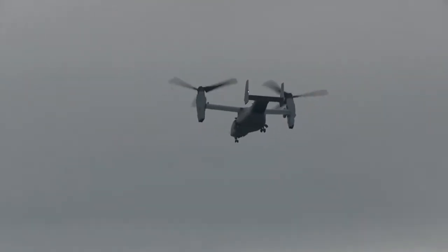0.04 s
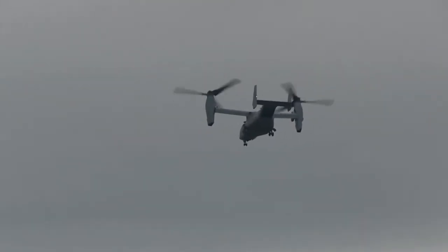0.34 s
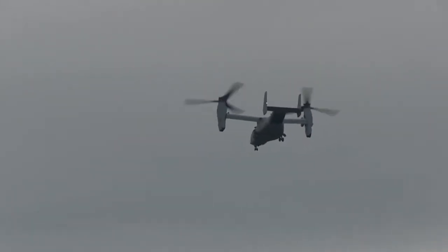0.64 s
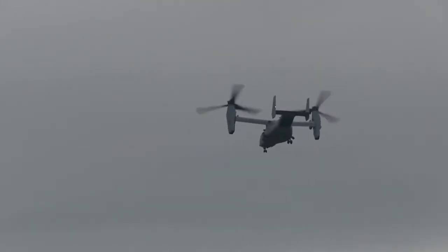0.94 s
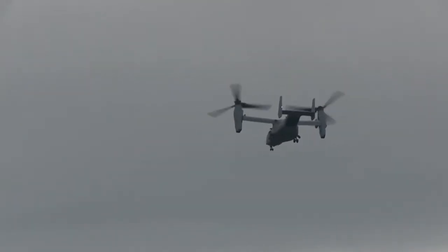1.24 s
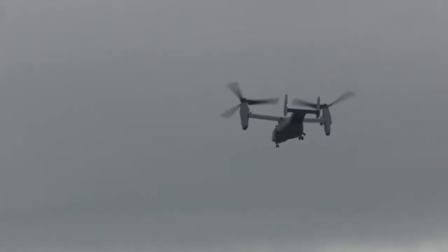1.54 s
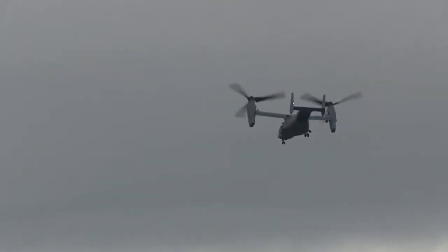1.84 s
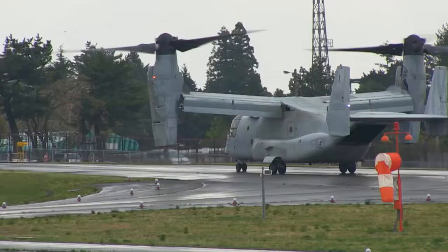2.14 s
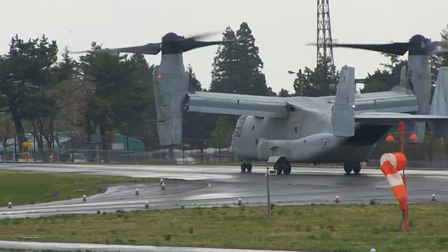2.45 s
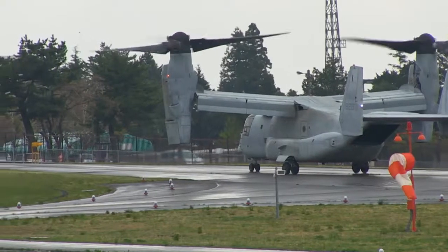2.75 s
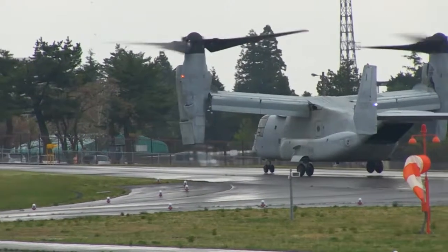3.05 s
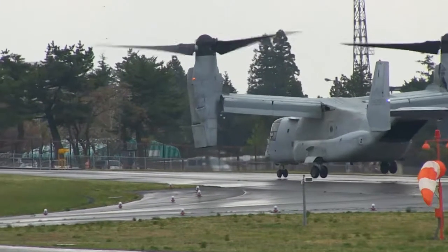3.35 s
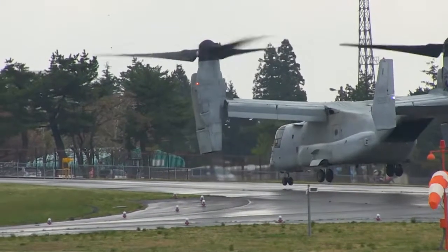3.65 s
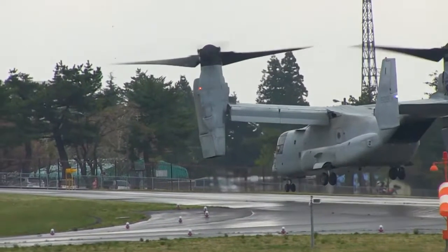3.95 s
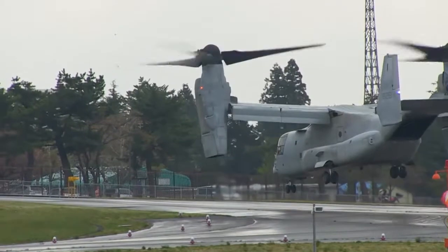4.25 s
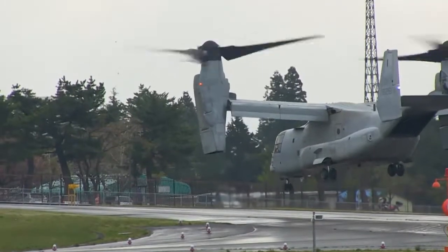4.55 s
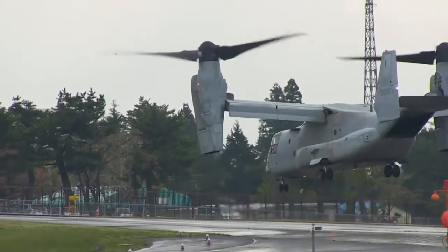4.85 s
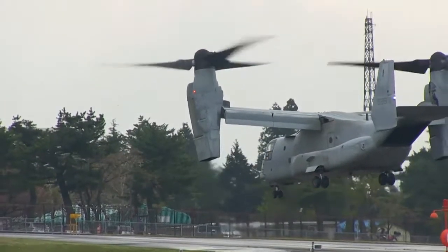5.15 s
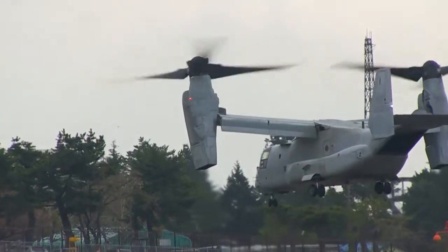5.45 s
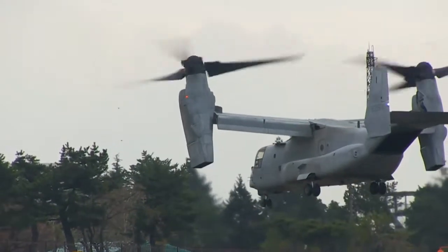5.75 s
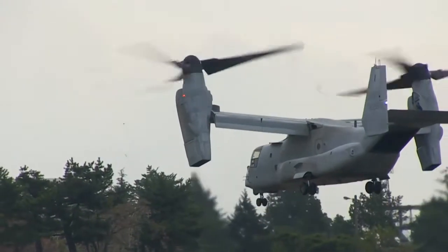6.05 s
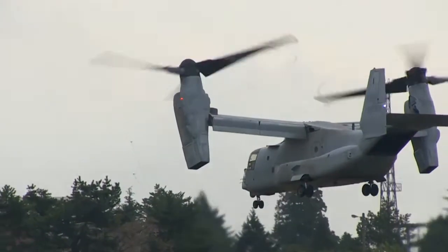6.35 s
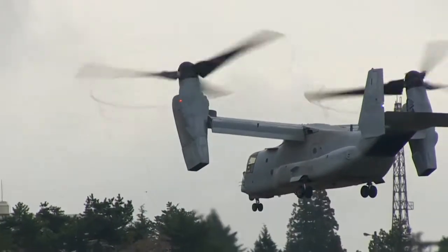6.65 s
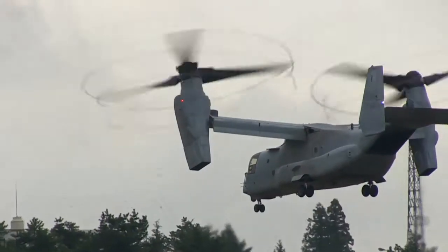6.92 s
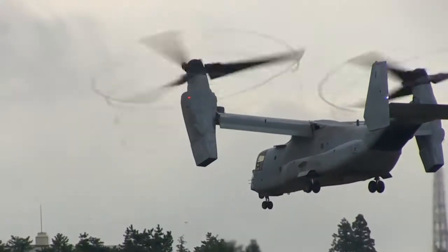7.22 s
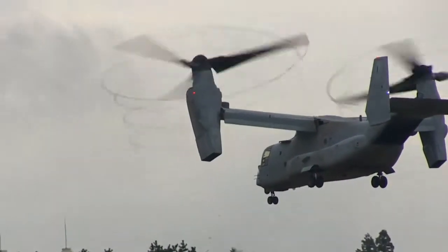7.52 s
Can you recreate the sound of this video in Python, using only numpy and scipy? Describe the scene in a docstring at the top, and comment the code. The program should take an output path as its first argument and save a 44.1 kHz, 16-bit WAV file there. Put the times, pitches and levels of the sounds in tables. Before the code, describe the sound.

A tiltrotor aircraft beats softly in the distance, then suddenly sounds close, lifting off with loud chopping slaps and engine roar before climbing away.

```python
"""A tiltrotor aircraft hovers far off; the scene then cuts to it lifting off close by and climbing away.
Each blade pass pushes out a low thump, slaps through the tip vortices of the blades ahead and swishes by;
the hardest strikes crack. Downwash and turbines roar between the beats, with a low rotor drone and a
breathy blade whistle. The two microphone channels are in opposite polarity and overload on big slaps."""
import sys
import numpy as np
from scipy import signal
from scipy.fft import rfft, irfft, next_fast_len
from scipy.io import wavfile
from scipy.ndimage import uniform_filter1d, map_coordinates

SR = 44100
rng = np.random.default_rng(int(sys.argv[2]) if len(sys.argv) > 2 else 0)


def transcribe(signal):
    """Save signal, clipped to [-1, 1], as a 16-bit WAV file at the path in sys.argv[1]."""
    frames = np.atleast_2d(signal).T
    limited = np.clip(frames, -1, 1)
    pcm = np.round(limited * 32767).astype(np.int16)
    wavfile.write(sys.argv[1], SR, pcm)


N = 338688
CUT_S = 2.16  # from the distant hover to the lift-off

# The rotor clock. Each row: time in seconds, blade passes so far.
PASSES = [(.004, 0), (1.578, 32), (2.176, 44), (2.749, 56), (3.521, 72), (4.29, 88), (5.073, 104),
          (6.239, 128), (7.026, 144), (7.72, 158)]
# The aircraft's swell with thrust and distance. Each row: time in seconds, dB relative to lift-off.
LOUDNESS = [(0, -15.5), (.6, -15.5), (1.4, -16), (2.14, -16), (2.5, -17), (2.85, -11.5), (3.3, -5.5),
            (3.781, 0.5), (4.151, -4), (4.6, -8), (5.3, -8.5), (5.751, -12.5), (6.3, -12), (7.151, -12.5),
            (7.68, -13)]
# How far the rotors have risen above the listener. Each row: time in seconds, share from 0 to 1.
RISEN = [(4.9, 0.35), (5.3, 0.8), (5.45, 0.7), (5.65, 1)]
# The hardest vortex strikes. Each row: time in seconds, slap level in dB, crack level in dB.
STRIKES = [(.5916, -51, -40), (0.6407, -48, -47), (0.6871, -46, -44), (3.1851, -27.5, -36),
           (3.2812, -21.5, -34.5), (3.2999, -32, -31.5), (3.3288, -21.5, -29), (3.3798, -16.5, -36),
           (3.4262, -19.5, -37.5), (3.4728, -36, -27.5), (3.521, -22, -27), (3.569, -21, -23),
           (3.617, -29, -24), (3.6618, -24, -35), (3.6655, -19, -20.5), (3.713, -23, -19),
           (3.733, -31.5, -30.5), (3.7612, -13.5, -26), (3.78, -35, -32), (3.8087, -14, -24),
           (3.8571, -19, -16.5), (3.9066, -26, -23), (3.9516, -13, -27.5), (3.9553, -13.5, -35),
           (4.0014, -8.5, -17.5), (4.0058, -19.5, -28.5), (4.0503, -24.5, -32), (4.072, -27, -32),
           (4.3456, -23, -30), (4.4363, -32, -36), (4.4841, -22, -35), (4.7273, -27.5, -37.5),
           (4.7772, -23, -36.5), (5.171, -28, -35), (5.3656, -27.5, -41.5)]


def amp(db):
    return 10 ** (np.asarray(db) / 20)


def unit(x):
    """Scale so that the first channel has rms 1."""
    return x / np.sqrt(np.mean(np.atleast_2d(x)[0] ** 2) + 1e-20)


def along(points, hz):
    """Read (Hz, value) points on a log frequency axis."""
    freqs, values = np.transpose(points)
    return np.interp(np.log(hz + 1), np.log(freqs + 1), values)


def curve(points):
    """(seconds, value) points as one value per sample."""
    return np.interp(np.arange(N) / SR, *np.transpose(points))


def bumps(times, half_length):
    """A bell-shaped swell, 0-1, around each time: samples x swells."""
    return np.exp(-((np.arange(N)[:, None] / SR - times) / half_length) ** 2)


def wobble(rate):
    """A smooth random curve, rate knots a second."""
    return map_coordinates(rng.standard_normal(int(N * rate / SR) + 4), [np.arange(N) * rate / SR])


def noise(channels=2):
    return rng.standard_normal((channels, N))


def filtered(x, response):
    """x through a frequency response."""
    size = next_fast_len(N + SR // 2)
    return irfft(rfft(x, size) * response(np.fft.rfftfreq(size, 1 / SR)), size)[..., :N]


def coloured(x, spectrum):
    """x through an EQ curve, at rms 1."""
    return unit(filtered(x, lambda hz: amp(along(spectrum, hz))))


def delayed(x, seconds):
    return filtered(x, lambda hz: np.exp(-2j * np.pi * hz * seconds))


def impulses(times, sizes):
    """Single-sample clicks at the given times."""
    at = np.round(np.ravel(times) * SR).astype(int)
    inside = (at >= 0) & (at < N)
    return np.bincount(at[inside], np.ravel(sizes)[inside], N)


def cut(far, near):
    """The distant hover gives way to the lift-off."""
    return np.where(np.arange(N) < CUT_S * SR, far, near)


def spread(pair):
    """A shared and a diffuse signal become left and right."""
    # Likeness of the two sides. Each row: frequency in Hz, coherence from 0 to 1.
    alike = [(100, 0.95), (300, 0.98), (600, 0.96), (1100, 0.81), (2200, 0.68), (4200, 0.87), (8000, 0.45)]
    angle = lambda hz: np.arccos(along(alike, hz)) / 2
    shared, diffuse = filtered(pair, lambda hz: np.array([np.cos(angle(hz)), np.sin(angle(hz))]))
    return np.array([shared + diffuse, shared - diffuse])


def beat_times():
    """The moment of every blade pass."""
    times, passes = np.transpose(PASSES)
    return np.interp(np.arange(passes[-1]), passes, times)


def at_beats(values):
    """A curve's value at every blade pass."""
    return np.interp(beat_times(), np.arange(N) / SR, values)


def since_beat(delay_s):
    """Seconds from the nearest blade pass, shifted by a delay."""
    passes = curve(PASSES)
    rate = np.mean(np.gradient(passes)) * SR
    passes = passes - delay_s * rate
    return (passes - np.round(passes)) / rate


def gentle(beats):
    """True for the blade passes that have no hard strike."""
    return np.abs(beats[:, None] - np.transpose(STRIKES)[0]).min(axis=1) > .01


def level(db, follows, overhead_db, far_db, treble=0, lag_s=0):
    """A layer's fader in dB: it follows the loudness and brightness, and shifts overhead and far off."""
    # The treble against the rest. Each row: time in seconds, gain in dB.
    brightness = [(0, 5), (.55, 5.5), (1.2, 1), (2.13, 1.5), (2.2, 4), (2.45, -1.5), (2.85, -2), (4.85, -2),
                  (5.6, -6.5), (6.5, -4), (7.1, -0.5), (7.68, 4)]
    loudness_db = curve(np.array(LOUDNESS) + [lag_s, 0])
    position_db = overhead_db * curve(RISEN) + cut(far_db, 0)
    return db + follows * loudness_db + position_db + treble * curve(brightness)


def turbines():
    """Compressor tones blurred by the air, loudest in front of the intakes and chopped by the blades."""
    # Each row: centre in Hz, width in Hz, level in dB.
    whine_bands = [(5890, 580, -82.5), (7500, 900, -92), (9080, 910, -99)]
    # How directly the intakes face the listener. Each row: time in seconds, gain in dB.
    facing = [(.7, 3.5), (2.14, 2.5), (2.18, -9.5)]
    whine = 0
    for centre, width, db in whine_bands:
        band = filtered(noise(), lambda hz: np.exp(-2 * ((hz - centre) / width) ** 2))
        whine += amp(db) * unit(band)
    chop_db = 2.3 * np.cos(2 * np.pi * curve(PASSES) + .8)
    return spread(whine * amp(curve(facing) + chop_db + 2.2 * wobble(16)))


def roar():
    """Churning downwash and hissing exhaust fill the gaps; the wash rumbles most near the ground."""
    # Colours of wash and exhaust. Each row: frequency in Hz, relative level in dB.
    downwash_eq = [(20, -10), (70, -9.5), (130, -0.5), (240, -2.5), (400, -5), (500, -9.5), (650, -4.5),
                   (950, -10.5), (1300, -14.5), (3000, -82)]
    exhaust_eq = [(600, -23), (1050, -3.5), (1500, -5.5), (2300, -7.5), (3300, -15.5), (4100, -15.5),
                  (5200, -28.5), (6000, -34.5), (7000, -39), (9500, -44.5), (11000, -85)]
    rumble_hz = 191
    wash_db = level(db=-44.0, follows=0.84, overhead_db=0.95, far_db=-1.5, lag_s=0.073)
    hiss_db = level(db=-55.5, follows=0.75, overhead_db=5.0, far_db=0.5, treble=0.6)
    rumble_db = level(db=5.5, follows=0.23, overhead_db=-1.5, far_db=-7.0)
    churn = wobble(12)
    surge_db = 1.68 * np.exp(-(since_beat(.006) / 0.019) ** 2)  # just after each blade
    flow = coloured(noise(), downwash_eq)
    rumble = filtered(flow, lambda hz: np.exp(-(hz / rumble_hz) ** 4))
    wash = amp(surge_db) * (flow - rumble) + amp(rumble_db) * rumble
    wash *= amp(wash_db + 1.7 * churn + 0.93 * wobble(70))
    hiss = amp(hiss_db + churn + 1.2 * wobble(90)) * coloured(noise(), exhaust_eq)
    return spread(wash + hiss)


def drone():
    """The lowest multiples of the blade rate, each wavering in the moving air."""
    # Rotor tones far and near. Each row: multiple of the blade rate, relative level in dB.
    far_orders = [(2, -3), (3, -2), (4, 8.5)]
    near_orders = [(1, -23), (2, -1), (3, -4), (4, 1.5)]
    # The drone's fader. Each row: time in seconds, level in dB.
    fader = [(0, -61), (.64, -67), (1.13, -63.5), (2.12, -67.5), (2.2, -59), (2.8, -63.5), (3.05, -77),
             (3.7, -59), (4.2, -56), (5, -55.5), (5.6, -58.5), (6.7, -62), (7.37, -60), (7.68, -63)]
    phase = 2 * np.pi * curve(PASSES)

    def tones(orders):
        return unit(sum(amp(db + 1.5 * wobble(2.2)) * np.cos(k * phase + np.pi / 4) for k, db in orders))
    return amp(curve(fader)) * cut(tones(far_orders), tones(near_orders))


def whistle(centre_hz, fall_hz_per_s, width_hz, delay_s, length_s):
    """Between slaps a blade edge sheds a wide, breathy tone that falls as the blade turns away."""
    # The whistle's fader. Each row: time in seconds, level in dB.
    fader = [(2.1, -86), (2.25, -71), (3.3, -59.5), (3.8, -53.5), (4.3, -57), (4.7, -61.5), (5.3, -61.5),
             (5.7, -67.5), (6.7, -74.5), (7.5, -64.5)]
    # Single whistles that stand out. Each row: time in seconds, boost in dB.
    accents = [(4.945, 9), (5.238, 8), (6.206, 6), (6.257, 9)]
    alike = 0.27  # share of the power common to both sides
    since = since_beat(delay_s)
    pitch = centre_hz * (1 + 0.07 * wobble(12)) - fall_hz_per_s * since
    breath = filtered(noise(3), lambda hz: np.exp(-(hz / width_hz) ** 2))
    breath = np.sqrt(alike) * breath[0] + np.sqrt(1 - alike) * breath[1:]
    times, boost_db = np.transpose(accents)
    swell = amp(bumps(times, .02) @ boost_db + 1.2 * wobble(20)) * np.exp(-(since / length_s) ** 2)
    tone = breath * np.sin(2 * np.pi * np.cumsum(pitch) / SR)
    return amp(curve(fader)) * unit(swell * tone)


def thumps():
    """Each blade's load pushes the air and pulls it back: a low thump."""
    # Surges of blade load at lift-off. Each row: centre and half length in seconds, boost in dB.
    surges = [(3.34, 0.16, 8), (3.695, 0.11, 7), (3.869, 0.086, 8), (3.996, 0.044, 4.5), (5.055, .2, 7)]
    # The thump's colour. Each row: frequency in Hz, relative level in dB.
    thump_eq = [(40, -37), (70, -15), (105, -2), (150, 3.5), (200, -0.5), (260, -13), (400, -78)]
    beats = beat_times()
    jitter = .0003 * rng.standard_normal(len(beats))
    pushes = impulses(beats + .0008 + jitter, amp(.9 * rng.standard_normal(len(beats))))
    times, half_length, boost_db = np.transpose(surges)
    thump_db = level(db=-36.0, follows=1.52, overhead_db=-4.0, far_db=-4.0)
    thump_db += bumps(times, half_length) @ boost_db + wobble(4.02)
    return amp(thump_db) * filtered(coloured(pushes, thump_eq), lambda hz: np.exp(.4j))


def wake():
    """In its own wake a blade slaps more squarely and briefly: gain in dB, square share, spread in s."""
    # Spells in the wake. Each row: centre and half length in seconds, slap gain in dB, added square share.
    spells = [(2.09, .06, 4, .3), (2.8, .05, 3, .23), (3.345, .06, -1.5, .3), (3.53, .13, -6, .2),
              (3.81, .12, -4, .5), (3.995, .035, 3, .6), (4.21, .06, -1.5, 0), (4.62, .09, -3, 0),
              (4.957, .2, 1, .1), (5.42, .11, 9.5, .5), (6.335, .07, 1.8, .55), (6.6, .19, 1, .9),
              (6.81, .05, 2.5, .5), (6.965, .044, 5.5, .3), (7.272, .022, 4.5, .3), (7.49, .04, 2, 0)]
    calm_share, spread_s = 0.12, .0055
    times, half_length, gain_db, added_share = np.transpose(spells)
    inside = bumps(times, half_length)
    share = np.clip(calm_share + inside @ added_share, 0, 1)
    width = spread_s * (1 - .5 * share) * amp(-.18 * curve(LOUDNESS))  # louder beats are tighter
    return inside @ gain_db, share, width


def vortex_strikes(share, width, memory, scatter_db, wander_s, reach, count):
    """Each blade cuts one vortex squarely and grazes more; the wake drifts from blade to blade."""
    beats = beat_times()
    share, width = at_beats(share)[:, None], at_beats(width)[:, None]
    size = amp(scatter_db * rng.standard_normal((len(beats), 1)))
    places = np.linspace(-1, 1, count)

    def drift():
        steps = rng.standard_normal((len(beats), count))
        return signal.lfilter([np.sqrt(1 - memory ** 2)], [1, -memory], steps, axis=0)

    def grazes(power):
        offsets = width * (reach * places + .12 * drift())
        weights = drift() * np.exp(-1.3 * places ** 2)
        weights /= np.linalg.norm(weights, axis=1, keepdims=True)
        return impulses(beats[:, None] + offsets, size * np.sqrt(power) * weights)
    square = impulses(beats + wander_s * drift()[:, 0], size * np.sqrt(share) * gentle(beats)[:, None])
    return np.array([square + grazes(1 - share), grazes(1)])


def swish(strikes, puffs, width):
    """A blade's turbulent edge hisses as its tip moves towards the listener; far off it is softer."""
    # Swish colours far and near. Each row: frequency in Hz, relative level in dB.
    far_eq = [(500, -52), (1000, -4), (1500, 1.5), (1900, -5.5), (2500, -2.5), (3300, -14.5), (4200, -9.5),
              (5300, -26.5), (6000, -58), (7000, -35.5), (10000, -41), (12000, -82)]
    near_eq = [(500, -4), (1000, 7), (1200, -7.5), (1500, 4.5), (2100, -2), (3200, -9), (4300, -13),
               (5200, -28.5), (6000, -30), (7000, -39.5), (9500, -50), (11500, -72.5)]
    risen = curve(RISEN)
    gate = np.exp(-np.abs(since_beat(0.00088 + .0008 * risen) / (1.23 * width)) ** 1.9) / np.sqrt(width)
    near = unit(gate * amp(3.0 * wobble(350)) * noise()) + 0.25 * (1 - risen) * unit(strikes)
    far_gate = np.exp(-(since_beat(-0.0016 + 0.00092 * wobble(23)) / 0.012) ** 2)
    far = unit(far_gate * amp(2.3 * wobble(200) + 1.2 * wobble(20)) * noise()) + 0.36 * unit(puffs)
    swish_db = level(db=-46.5, follows=0.93, overhead_db=-4.0, far_db=-0.8, treble=0.84)
    return amp(swish_db) * cut(coloured(far, far_eq), coloured(near, near_eq))


def slap(strikes, puffs, wake_db):
    """Vortex strikes slap; under the rotors the slap turns rounder and the ground answers it."""
    # Slap colours far, near and climbing. Each row: frequency in Hz, relative level in dB.
    far_eq = [(140, -28.5), (210, 9), (290, 4.5), (390, 8), (500, -5.5), (680, 4), (900, -5.5), (1150, -29),
              (2000, -37), (5000, -72)]
    near_eq = [(140, -34), (205, -1.5), (280, -1.5), (350, 2), (430, 1), (520, -13.5), (640, -2),
               (800, -3.5), (1000, -25.5), (2000, -40), (5000, -82)]
    climb_eq = [(140, -36.5), (195, 6), (245, 7), (300, 3), (390, 1.5), (500, -13), (760, -14.5),
                (1000, -26.5), (2000, -28), (5000, -85)]
    # Crossfade to the round overhead slap. Each row: time in seconds, share from 0 to 1.
    roundness = [(4.9, .25), (5.3, 0.5), (5.45, .85), (6.1, 0.56), (6.4, 1), (6.75, 0.92), (7.1, 0.5),
                 (7.6, 0.61)]
    ground_echo = amp(-11.5) * delayed(strikes, seconds=0.014)
    overhead = coloured(strikes + ground_echo, climb_eq)
    overhead = filtered(overhead, lambda hz: np.exp(.7j))  # a push, then a pull
    blend = curve(roundness)
    near = (1 - blend) * coloured(strikes, near_eq) + blend * overhead
    slap_db = level(db=-32.5, follows=1.328, overhead_db=3.5, far_db=-2.5) + wake_db
    return amp(slap_db) * cut(coloured(puffs, far_eq), near)


def through_air(x, depth_db):
    """Turbulent air lifts and dims patches of the spectrum, so the colour drifts from beat to beat."""
    frames = signal.stft(x, nperseg=512)[2]
    patches = uniform_filter1d(rng.standard_normal(frames.shape[1:]), size=5, axis=0)
    patches = uniform_filter1d(patches, size=24, axis=1)
    return signal.istft(frames * amp(depth_db * patches / patches.std()), nperseg=512)[1][:, :N]


def blade_beats():
    """Slap and swish of every blade; far off, the air smears each strike into a soft puff."""
    wake_db, share, width = wake()
    strikes = vortex_strikes(share, width, memory=0.8235, scatter_db=1.5,
                             wander_s=0.00037, reach=1.506, count=12)
    puffs = vortex_strikes(0.34 * share, width, memory=0.7, scatter_db=-0.45,
                           wander_s=0.00048, reach=1.902, count=24)
    puffs = delayed(puffs, seconds=0.000977)
    return spread(through_air(slap(strikes, puffs, wake_db) + swish(strikes, puffs, width), depth_db=1.8))


def hard_strikes():
    """A square strike is a pressure peak between two troughs; it steepens into a crack with a rasp."""
    # Colours of the crack and of the slap under it. Each row: frequency in Hz, relative level in dB.
    crack_eq = [(300, -12), (750, 6.5), (1600, 10.5), (3000, -2.5), (4300, -4.5), (5300, -18),
                (6000, -17.5), (8000, -28.5), (11000, -35), (13000, -56.5)]
    slap_eq = [(60, -16), (120, -0.5), (210, 4), (350, 1.5), (550, -2), (800, -3), (1200, -22.5),
               (2500, -32), (5000, -74)]
    rasp, rise_s, fade_s = 0.14, 0.013, 0.019  # size against the peak; times to swell and fade by 60 dB
    beats = beat_times()
    hard_times, slap_db, hard_db = np.transpose(STRIKES)
    # the gentle passes get a small crack too
    scatter_db = 3 * np.clip(rng.standard_normal(len(beats)), -2, 1)
    small_db = -29.5 + 2.1 * at_beats(curve(LOUDNESS)) + scatter_db
    times = np.r_[hard_times, beats[gentle(beats)]]
    sizes = amp(np.r_[hard_db, small_db[gentle(beats)]])
    t = np.arange(-SR // 100, SR // 50) / SR
    envelope = amp(-60 * np.abs(t) / np.where(t < 0, rise_s, fade_s))
    shape = rasp * rng.standard_normal((len(times), 2, len(t))) * envelope
    shape[:, 0, t == 0] = 1  # the peak sits in the shared signal
    shocks = np.array([impulses(times[:, None] + t, sizes[:, None] * shape[:, k]) for k in range(2)])

    def peaked(x, eq):
        """EQ that keeps a click's peak height."""
        return filtered(x, lambda hz: amp(along(eq, hz)) / np.mean(amp(along(eq, hz))))
    return spread(peaked(shocks, crack_eq)) + peaked(impulses(hard_times, amp(slap_db)), slap_eq)


def microphone_ports(hz):
    """The two ports colour the sound differently; the right channel is inverted."""
    # Each row: frequency in Hz, left minus right in dB, lead of left over the inverted right in radians.
    ports = [(40, 3.2, -.55), (95, .3, -.1), (145, .4, .15), (220, 1.8, .36), (350, 4, .44),
             (450, 7.5, -.1), (640, 3, .33), (870, 8, -.1), (1120, 3, -.35), (1380, 4.6, .7),
             (1650, 10, .1), (2400, 8, .1), (3200, 5.3, -.3), (5000, 5, -.05), (8000, 2.3, -.1)]
    balance_db, lead = [along(np.array(ports)[:, [0, k]], hz) for k in (1, 2)]
    pan = np.arctan(amp(-balance_db))
    turn = np.exp(.5j * lead)
    return np.sqrt(2) * np.array([np.cos(pan) * turn, -np.sin(pan) / turn])


def scene():
    """Rotors and engines through the microphone ports, with the wide whistle laid on top."""
    aircraft = thumps() + blade_beats() + hard_strikes() + drone() + roar() + turbines()
    whistles = whistle(centre_hz=1162, fall_hz_per_s=15700, width_hz=346, delay_s=.0215, length_s=0.0084)
    return filtered(aircraft, microphone_ports) + whistles


def record(dry):
    """The hardest slaps overload the input, the right side first; then faint hiss and a treble cut."""
    ceiling, knee = np.array([[.225], [.09]]), np.array([[5], [4]])  # left, right
    top_hz = 13300
    clipped = dry / (1 + np.abs(dry / ceiling) ** knee) ** (1 / knee)
    return filtered(clipped + amp(-100.0) * noise(), lambda hz: hz < top_hz)


dry = scene()
out = record(dry)
transcribe(out)
```